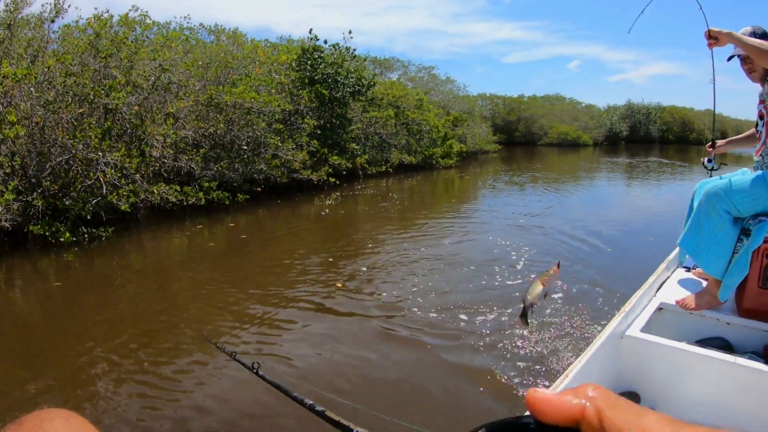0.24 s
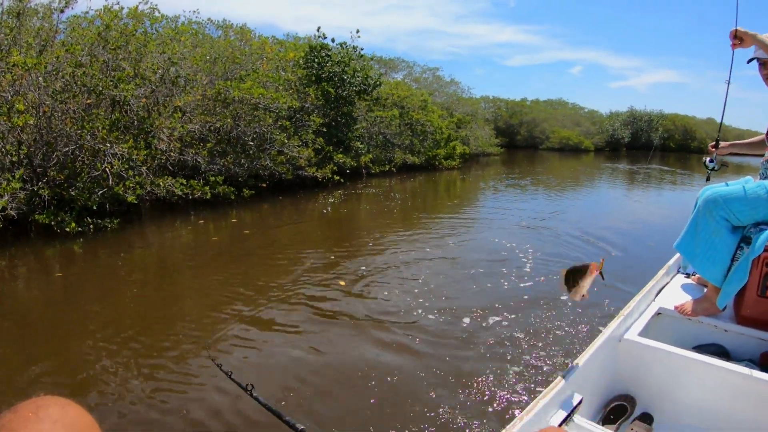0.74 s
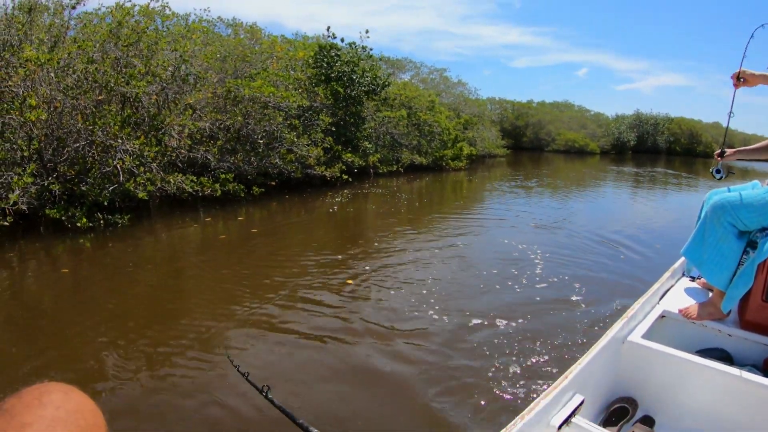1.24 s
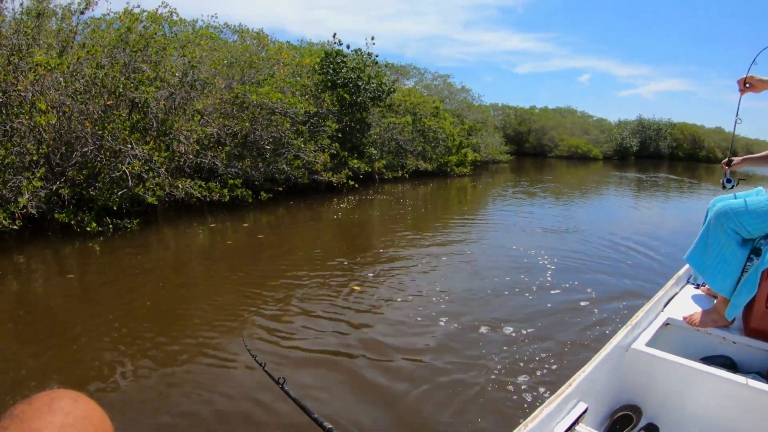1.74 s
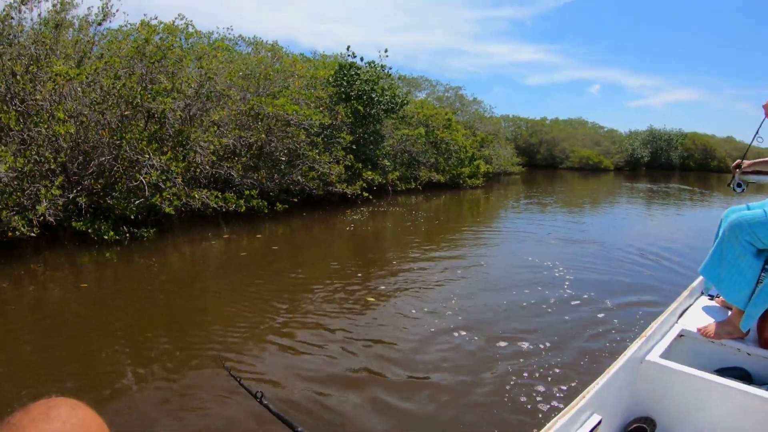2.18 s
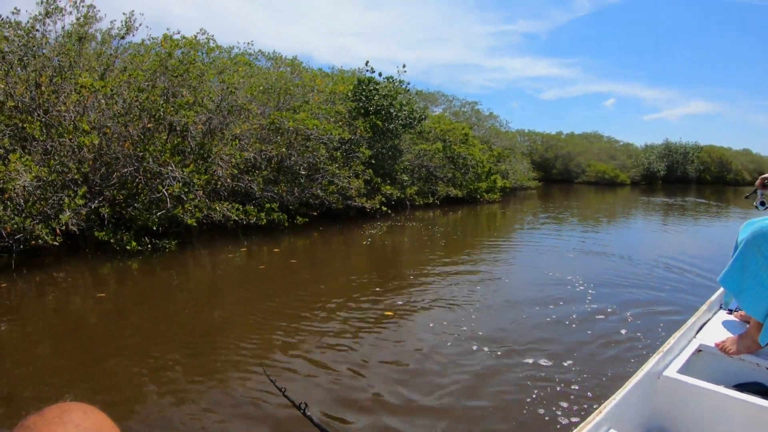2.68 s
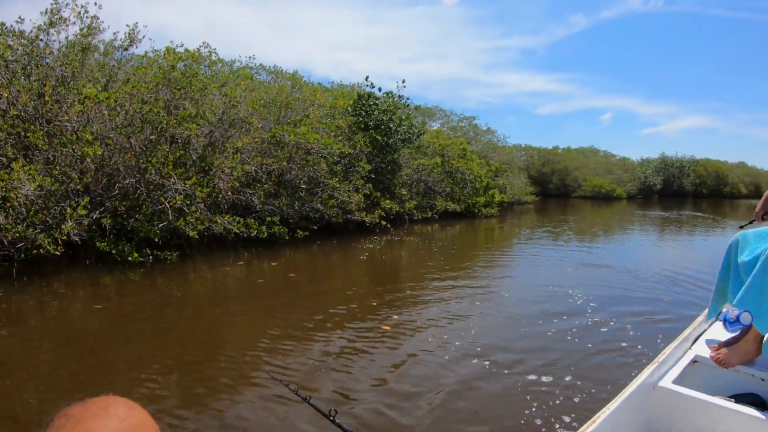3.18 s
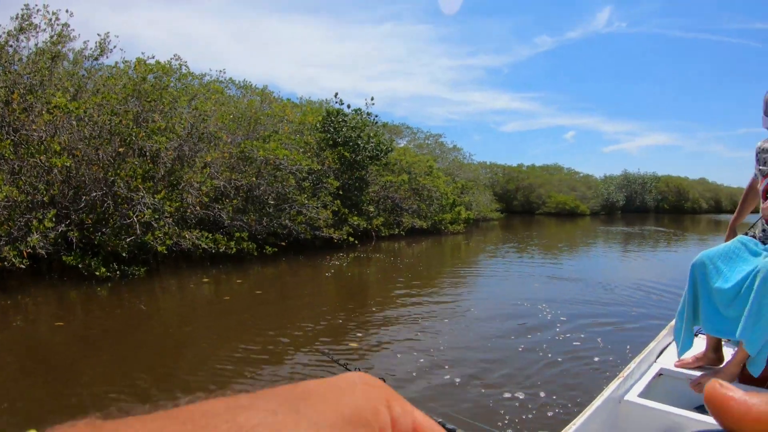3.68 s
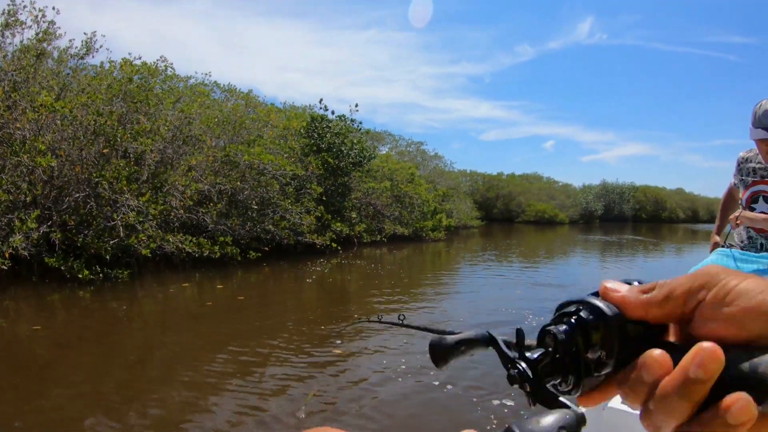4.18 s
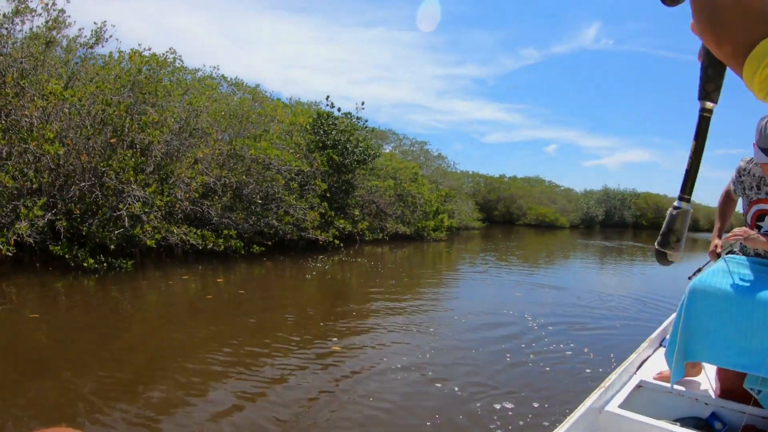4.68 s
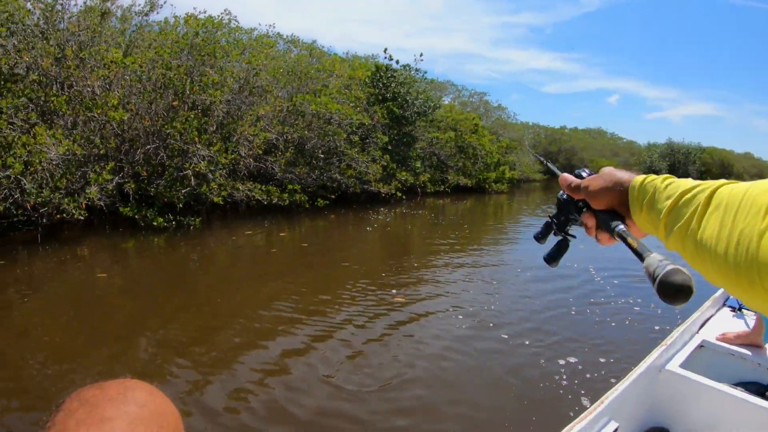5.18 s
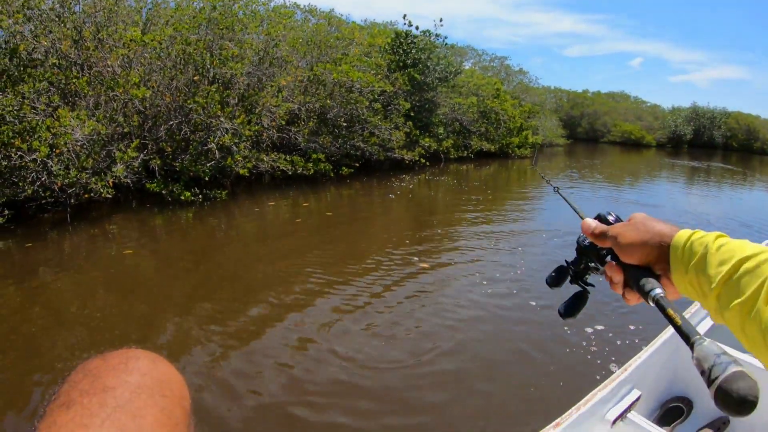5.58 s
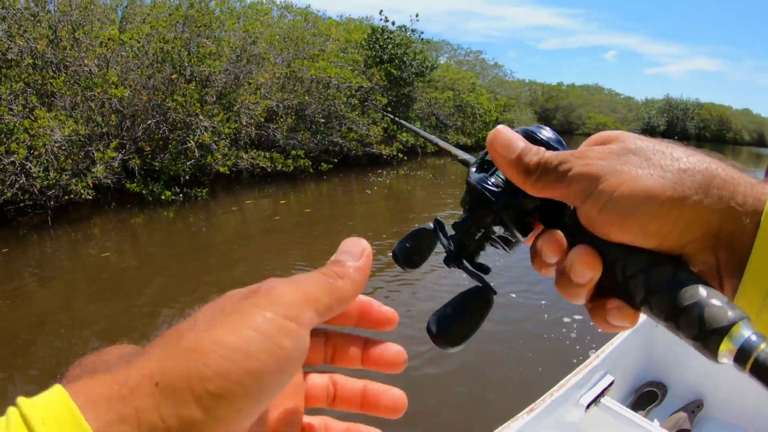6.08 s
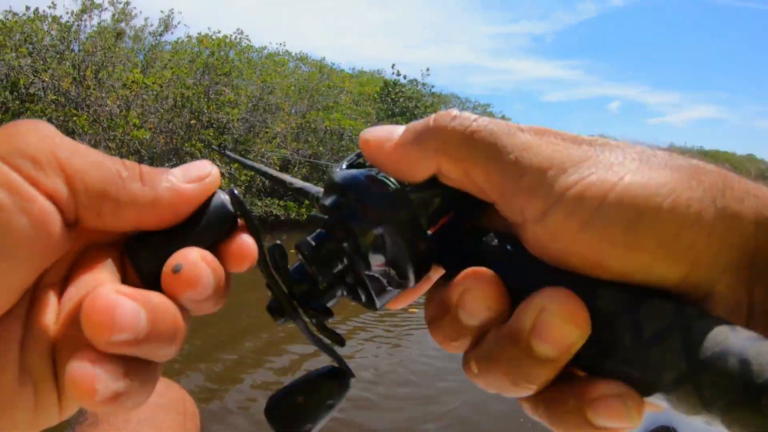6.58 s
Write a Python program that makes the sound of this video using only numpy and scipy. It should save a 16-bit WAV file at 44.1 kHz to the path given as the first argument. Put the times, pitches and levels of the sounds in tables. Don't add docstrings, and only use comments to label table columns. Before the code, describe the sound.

A very low, faint motor hum and gentle lapping, fizzing water run throughout, close and dry in open air. From 0 to 1 s there are only small drips and bubbles. At 1.1 s a wet slap hits the hollow fibreglass hull with a bright crackle, followed by weaker flops and drips until 2.3 s. At 2.65 s a thump starts the main struggle: rapid tail flicks at 2.8-2.9 s, the loudest slap and booming hull blow at about 3.0 s, another hard flop at 3.26 s, then irregular thumps, spray and gurgling bubbles fading by 4 s. The rod rattles lightly on deck from 3.1 to 4.7 s; a sharp metallic catch clicks at 4.15 s. A soft broad swish peaks at 4.95 s, with a faint rising whistle, slosh and bumps around 5.05 s. Barely audible line hiss and squeaks follow until 5.8 s. Quick reel snaps at 6.5 s lead into quiet gear winding.

```python
import sys
import numpy as np
from scipy import signal
from scipy.fft import rfft, irfft, next_fast_len
from scipy.io import wavfile
from scipy.ndimage import uniform_filter1d, map_coordinates

SR = 44100
rng = np.random.default_rng(int(sys.argv[2]) if len(sys.argv) > 2 else 0)


def convert_level_to_amplitude(level_db):
    exponent = np.asarray(level_db, float) / 20
    return 10 ** exponent


def materialize(psi):
    bounded = np.clip(np.atleast_2d(psi).T, -1, 1)
    quanta = np.round(bounded * 32767).astype(np.int16)
    wavfile.write(sys.argv[1], SR, quanta)


N = 301203
SECONDS = np.arange(N) / SR
T = np.arange(SR // 2) / SR


def unit(x):
    return x / np.sqrt(np.mean(x ** 2) + 1e-20)


def noise():
    return rng.standard_normal(N)


def sine(hz):
    return np.sin(2 * np.pi * hz * T)


def curves(rows):
    s, *cols = np.transpose(rows)
    return [np.interp(SECONDS, s, c) for c in cols]


def wobble(rate):
    return map_coordinates(rng.standard_normal(int(N * rate / SR) + 4), [np.arange(N) * rate / SR])


def coloured(x, spectrum):
    m = next_fast_len(N + 8192)
    f, v = np.transpose(spectrum)
    log_hz = np.log(np.fft.rfftfreq(m, 1 / SR) + 1)
    gain = convert_level_to_amplitude(np.interp(log_hz, np.log(f + 1), v, left=-120, right=-120))
    return unit(irfft(rfft(x, m) * gain, m)[:N])


def bands(modes):
    f = np.fft.rfftfreq(N, 1 / SR)
    gain = sum(convert_level_to_amplitude(db) / (1 + (2 * (f - hz) / width) ** 2) for hz, width, db in modes)
    return unit(irfft(rfft(noise()) * gain, N))


def grainy(per_s, spread_db, share, life):
    hits = (rng.random(N) < per_s / SR) * convert_level_to_amplitude(spread_db * np.minimum(rng.exponential(size=N), 3.2))
    swell = signal.lfilter([1], [1, -np.exp(-1 / (life * SR))], hits)
    share = np.clip(share, 0, 1)
    return noise() * (1 - share + share * unit(swell))


def patchy(x, depth_db):
    z = signal.stft(x, nperseg=512)[2]
    field = uniform_filter1d(rng.standard_normal(z.shape), size=12, axis=0)
    field = uniform_filter1d(field, size=12, axis=1)
    return signal.istft(z * convert_level_to_amplitude(depth_db * unit(field)), nperseg=512)[1][:N]


def shape(t60, rise):
    e = convert_level_to_amplitude(-60 * T / max(t60, .004)) * (1 - np.exp(-T / max(rise, 1e-4))) ** 2
    return e / e.max()


def ring(modes, rise, luck):
    return sum(convert_level_to_amplitude(db) * shape(t60, rise) * np.sin(2 * np.pi * (hz * T + a))
               for (hz, db, t60), a in zip(modes, luck))


def add(track, s, sound):
    part = track[round(s * SR):][:len(sound)]
    part += sound[:len(part)]


# start in seconds, peak in dB, pitch in Hz, overtones in dB.
SLAPS = [(1.056, -34, 715, -5.5), (1.108, -18.5, 504, -23), (1.121, -32, 340, -23), (1.225, -42, 500, -39),
         (1.381, -35, 464, -17.5), (1.785, -37.5, 630, -10), (1.904, -40.5, 418, -20),
         (2.273, -37.5, 600, 0), (2.666, -22.5, 362, -20), (2.989, -21, 321, -7.5), (3.12, -20, 611, -17),
         (3.257, -14, 720, -19), (3.271, -19, 670, -21), (3.43, -32, 658, -10), (3.53, -27.5, 323, -15),
         (3.646, -27, 314, -11), (3.791, -31.5, 642, -25), (3.814, -26, 650, -13), (3.943, -36.5, 650, -17),
         (5.046, -30.5, 355, -23), (5.075, -25.5, 482, -8.5)]
# start in seconds, peak in dB, pitch in Hz, overtones in dB.
FLICKS = [(2.812, -26, 740, -11), (2.824, -21, 760, -9.5), (2.831, -18, 720, -5.5), (2.841, -14, 753, -19),
          (2.853, -29, 700, -20.5), (2.862, -14.5, 740, -23), (2.873, -21, 700, -5),
          (2.886, -21.5, 740, -9.5), (2.893, -18, 640, -12), (2.902, -24.5, 620, -6.5),
          (6.535, -29.5, 693, -8)]
# start in seconds, peak in dB, pitch
# in Hz.
SOFT_SLAPS = [(0.044, -41.5, 820), (0.067, -41, 660), (0.094, -39.5, 620), (0.333, -37.5, 607),
              (1.194, -43, 338), (2.294, -43, 663), (2.593, -38.5, 290), (4.059, -48, 740), (1.6, -44, 300),
              (4.585, -47, 320), (6.38, -50.5, 620), (5.62, -54, 460), (5.45, -50, 495), (1, -46, 680),
              (5.389, -46, 530), (6.042, -46, 392), (6.21, -48.5, 580)]
# start in seconds, peak in dB, pitch in Hz, overtones in dB, t60 in seconds.
HARDEST_SLAP = (3, -4.5, 672.5, -17, 0.0431)
# frequency in Hz, density in dB per Hz.
WASH_BODY = [(200, -41.5), (320, -1.5), (520, 0.5), (700, 2), (950, -14), (1300, -55)]
# frequency in Hz, density in dB per Hz.
WASH_SPRAY = [(800, -26.5), (1050, 17), (1400, 14), (2000, -44), (2600, -15), (3200, -62)]


def fish():
    slap_t60, slap_rise = 0.061, 0.00079
    flick_t60, flick_rise = 0.021, 0.0014
    soft_t60, soft_over_db = 0.062, -16.5
    hits = [(*row, slap_t60, slap_rise) for row in SLAPS]
    hits += [(*row, flick_t60, flick_rise) for row in FLICKS]
    hits += [(*row, soft_over_db, soft_t60, slap_rise) for row in SOFT_SLAPS]
    hits += [(*HARDEST_SLAP, slap_rise)]
    out, wet = np.zeros(N), np.zeros((N, 2))
    for (s, db, hz, over_db, t60, rise), luck in zip(hits, rng.random((len(hits), 6))):
        over = sum(np.sin(2 * np.pi * (1000 + 1300 * a ** 1.57) * T + 40 * a) for a in luck)
        pocket = sine(hz) + convert_level_to_amplitude(over_db - 16.0) * over
        add(out, s, convert_level_to_amplitude(db - 4) * shape(t60, rise) * pocket)
        add(wet, s, shape(1.54 * t60, 0.0048)[:, None] * convert_level_to_amplitude([db - 15, db + over_db - 14.5]))
    drops = grainy(90, 1.1, 0.086, 0.014)
    return out + wet[:, 0] * coloured(drops, WASH_BODY) + wet[:, 1] * coloured(drops, WASH_SPRAY)


# start in seconds, peak in dB, panel pitch in Hz, t60 in seconds.
THUMPS = [(1.063, -38, 270, 0.29), (1.107, -15.5, 248, 0.058), (1.112, -27.5, 148, 0.11),
          (1.148, -25, 201, 0.024), (1.198, -29.5, 263, 0.073), (1.246, -36.5, 278, 0.085),
          (1.318, -37, 261, 0.08), (1.368, -38, 267, 0.042), (1.424, -43, 283, 0.075),
          (1.9, -26.5, 184, 0.087), (2.678, -21.5, 167.7, 0.15), (2.71, -22, 194, 0.016),
          (2.861, -31, 248, 0.39), (2.916, -20, 148, 0.23), (2.984, -10.5, 248, 0.11),
          (3.12, -25.5, 347, 0.053), (3.256, -21.5, 110.5, 0.29), (3.285, -25, 108, 0.39),
          (3.419, -22.5, 149.6, 0.14), (3.448, -35.5, 312, 0.038), (3.469, -27.5, 125.5, 0.082),
          (3.533, -28, 153, 0.19), (3.587, -31, 258, 0.042), (3.644, -15.5, 168.6, 0.054),
          (3.671, -19, 149.4, 0.077), (3.79, -26, 146.4, 0.15), (3.819, -21, 131.8, 0.19),
          (3.828, -27, 295, 0.055), (3.857, -35.5, 315, 0.051), (3.86, -24.5, 110, 0.083),
          (3.941, -26, 150, 0.091), (3.945, -35.5, 323, 0.059), (3.968, -29, 138.7, 0.2),
          (3.997, -50, 277, 0.068), (4.034, -62, 224, 0.064)]
# start in seconds, peak in dB, panel pitch in Hz.
SHIFTS = [(0.089, -48, 181), (2.266, -40.5, 163.4), (4.562, -40, 141), (4.906, -38.5, 108),
          (5.003, -29, 127.3), (5.049, -42, 170), (5.796, -41, 130), (6.451, -34, 131.2),
          (6.671, -43.5, 184)]
# start in seconds, ring in dB, impact in dB.
BLOWS = [
    (1.109, -27.5, -18.5),
    (2.958, -17, -7.5),
    (3.255, -22.5, -36),
]
# frequency in Hz, level in dB, t60 in seconds.
HULL_MODES = [(108, 0, 0.28), (190.2, 5.5, 0.11), (248, 5, 0.18)]


def hull():
    out = np.zeros(N)
    shift_t60 = 0.26
    for s, db, hz, t60 in THUMPS + [(*row, shift_t60) for row in SHIFTS]:
        add(out, s, convert_level_to_amplitude(db) * shape(t60, 0.0018) * sine(hz))
    for s, db, impact_db in BLOWS:
        shell = sum(convert_level_to_amplitude(db + level) * shape(t60, 0.0016) * sine(hz) for hz, level, t60 in HULL_MODES)
        add(out, s, shell)
        dent = -convert_level_to_amplitude(impact_db + 3) * shape(0.032, 0.00064) * sine(270)
        add(out, s - .0026, dent)
    return out


# start in seconds, peak in dB, t60 in seconds, low band in dB.
SNAPS = [(1.058, -34, 0.064, -22), (1.0897, -41, 0.35, -6.5), (1.109, -32.5, 0.049, 1),
         (1.596, -46.5, 0.13, -4.5), (1.778, -37.5, 0.13, -14), (1.894, -42.5, 0.07, -15),
         (2.272, -35, 0.057, -13), (2.596, -52, 0.059, -6), (2.663, -28.5, 0.071, -7.5),
         (2.809, -34, 0.071, -21), (2.8294, -41, 0.09, 8), (2.865, -36, 0.097, 5), (2.8944, -42, 0.1, 0),
         (2.927, -38, 0.16, -8), (2.952, -29, 0.059, -4), (3.12, -33.5, 0.059, -4.5),
         (3.257, -35, 0.11, -3), (3.307, -50, 0.071, 6), (3.423, -37, 0.04, -9), (3.44, -36.5, 0.051, -2.5),
         (3.527, -37.5, 0.065, -17), (3.793, -40, 0.017, -14), (3.812, -53.5, 0.16, 2),
         (4.244, -42.5, 0.11, -45), (5.738, -46, 0.34, -15.5)]
# start in seconds, peak in dB.
TICKS = [(0.4788, -49), (0.513, -49), (0.5915, -62), (1.021, -50), (2.316, -45.5), (2.9936, -41.5),
         (3.057, -43), (3.486, -46), (3.6476, -45), (3.771, -47.5), (4.0953, -54), (4.333, -54),
         (4.4939, -52), (6.392, -50), (6.4843, -53), (6.5901, -51), (6.6135, -51), (6.641, -55),
         (6.755, -55)]
# centre in seconds, level in dB, half-width in seconds, low band in dB.
SHEETS = [(0.7, -68, 0.038, -2), (2.05, -72, 0.079, 1.5), (2.49, -63.5, 0.034, -4),
          (2.636, -56, 0.023, 6.5), (3.411, -61, 0.0088, -8), (3.71, -62.5, 0.02, -9),
          (4.138, -56, 0.0078, -4), (6.2, -69, .08, -4.5)]
# frequency in Hz, density in dB per Hz.
CRACKLE_BRIGHT = [(1760, -13.5), (3000, -13), (3510, -8), (4010, 0.5), (4860, 0.5), (5450, 0), (6320, 1.5),
                  (6890, -12), (8060, -21.5), (9000, -41.5), (11700, -36), (19800, -120)]
# frequency in Hz, density in dB per Hz.
CRACKLE_TOP = [(5290, -12), (9000, -5.5), (9770, -14.5), (11200, -20), (11800, -11.5), (12500, -4),
               (14000, -10.5), (15600, -17)]
# frequency in Hz, density in dB per Hz.
CRACKLE_LOW = [(900, -15), (1200, 7.5), (2000, -6.5), (2900, -21.5), (3300, -27)]


def snaps():
    tick_t60, tick_low_db, top_db = 0.049, -9.5, -23.5
    levels = np.zeros((N, 3))
    for s, db, t60, low_db in SNAPS + [(*row, tick_t60, tick_low_db) for row in TICKS]:
        band_db = [db - 10.5, db + top_db - 4.0, db + low_db - 5.0]
        add(levels, s - .004, shape(t60, 0.0039)[:, None] * convert_level_to_amplitude(band_db))
    for s, db, width, low_db in SHEETS:
        swell = np.exp(-((SECONDS - s) / width) ** 2 / 2)
        levels += swell[:, None] * convert_level_to_amplitude([db, db + top_db + 2, db + low_db])
    crackle = grainy(360, 0.75, 0.41, 0.0012)
    spectra = (CRACKLE_BRIGHT, CRACKLE_TOP, CRACKLE_LOW)
    return sum(level * coloured(crackle, band) for level, band in zip(levels.T, spectra))


# start in seconds, peak in dB.
SPIKES = [(1.059, -49), (1.1079, -39), (1.7816, -43), (1.898, -54), (2.2727, -40), (2.663, -42),
          (2.8639, -51), (2.9527, -36), (3.1226, -57), (3.2568, -47.5), (3.4246, -43.5), (3.4394, -49.5),
          (3.5293, -40.5), (3.5663, -59), (3.6491, -57), (3.7683, -52.5), (3.7903, -57.5), (3.8127, -62)]
# frequency in Hz, density in dB per Hz.
SPIKE_COLOUR = [(1500, -9), (3000, -3.5), (4200, 1), (6500, -1.5), (8500, -6), (11000, -22), (12600, -8.5),
                (15600, -19.5)]


def spikes():
    level = np.zeros(N)
    for s, db in SPIKES:
        add(level, s, convert_level_to_amplitude(db - 3.0) * shape(.008, .001))
    return level * coloured(noise(), SPIKE_COLOUR)


# start in seconds, peak in dB, upper modes in dB, favoured pitch in Hz.
BOUNCES = [(3.058, -59.5, 8.5, 1250), (3.121, -37, -8, 1200), (3.31, -34, -3.5, 1110),
           (3.566, -50.5, 9, 1140), (3.65, -44, -9, 1400), (3.716, -42.5, -9, 1410), (3.773, -46, -8, 1420),
           (3.848, -54, -2, 1360), (4.17, -46.5, -7.5, 1410), (4.246, -48, -12, 1250),
           (4.458, -70.5, 4, 1400), (4.502, -64.5, 6.5, 1470), (4.544, -62.5, 1, 1460),
           (4.572, -64, 9, 1310), (4.609, -74, 16, 1430), (4.645, -81, 27.5, 1430),
           (4.717, -85.5, 22, 1400)]
# frequency in Hz, level in dB, t60 in seconds.
GUIDE_MODES = [(1020, 0, 0.22), (1093, -3, 0.066), (1202, -1, 0.14), (1332, 5, 0.057), (1447, 6.5, 0.054),
               (1997, 2.5, 0.069)]
# start in seconds, peak in dB.
TAPS = [(3.646, -57), (3.714, -51), (3.772, -58), (4.095, -49), (4.312, -59.5), (4.326, -67), (4.36, -63),
        (4.372, -61.5)]
# frequency in Hz, level in dB, t60 in seconds.
TIP_MODES = [(830, -7, .06), (1040, -14, 0.26), (1328, -6, 0.074), (1660, -0.5, 0.045), (2354, -8, 0.032)]


def rod():
    blank_hz, blank_t60 = 601, 0.21
    favour_db = 19.5
    out = np.zeros(N)
    note = shape(blank_t60, 0.00022) * sine(blank_hz)
    lucks = rng.standard_normal((len(BOUNCES), len(GUIDE_MODES)))
    for (s, db, upper_db, near_hz), luck in zip(BOUNCES, lucks):
        guides = 0
        for (hz, level, t60), a in zip(GUIDE_MODES, luck):
            mode_db = level + 2 * a - favour_db * abs(np.log2(hz / near_hz))
            tone = np.sin(2 * np.pi * hz * (1 + 0.0047 * a) * T + 9 * a)
            guides = guides + convert_level_to_amplitude(mode_db) * shape(t60, 0.0025) * tone
        add(out, s, convert_level_to_amplitude(db + 8.5) * note + convert_level_to_amplitude(db + upper_db - 2.5) * guides)
    for (s, db), luck in zip(TAPS, rng.random((len(TAPS), len(TIP_MODES)))):
        add(out, s, convert_level_to_amplitude(db) * ring(TIP_MODES, 0.0016, luck))
    return out


# time in seconds, level in dB.
SWISH = [
    (4.74, -84),
    (4.87, -53.5),
    (4.95, -51.5),
    (5.1, -56),
    (5.25, -66),
    (5.4, -90),
]
# frequency in Hz, density in dB per Hz.
SLEEVE = [(250, 3.5), (500, 2.5), (1500, -10.5), (2300, -12), (3000, -35), (4300, -17.5), (6300, -14),
          (8000, -35), (13000, -44), (15500, -40)]
# time in seconds, pitch in Hz, level in dB.
WHIP = [(4.98, 4200, -90), (5.015, 4700, -64), (5.04, 6400, -65), (5.055, 8000, -69), (5.075, 9000, -78),
        (5.14, 12300, -83), (5.18, 13500, -100)]
# time in seconds, level in dB.
WHIRR = [(5.25, -100), (5.35, -84), (5.55, -82), (5.62, -82), (5.8, -78), (5.84, -100)]
# frequency in Hz, density in dB per Hz.
SPOOL = [(6500, -45), (7200, -19), (8200, -5.5), (8900, -12), (9400, -21)]


def cast():
    hz, whistle_db = curves(WHIP)
    flutter, breaks_db = .055 * wobble(1500), 3 * wobble(200)
    whistle_phase = 2 * np.pi * np.cumsum(hz * (1 + flutter)) / SR
    whistle = convert_level_to_amplitude(whistle_db + breaks_db) * np.sin(whistle_phase)
    air = patchy(grainy(90, 2.59, 0.37, 0.0098), 0.57)
    swish = convert_level_to_amplitude(curves(SWISH)[0]) * coloured(air, SLEEVE)
    spool = convert_level_to_amplitude(curves(WHIRR)[0] + breaks_db) * coloured(noise(), SPOOL)
    return swish + whistle + spool


# start in seconds, peak in dB, top band in dB, body in dB.
CLICKS = [(4.146, -19, -30.5, -19), (4.221, -48.5, -28, -18), (4.268, -45, -23, -32),
          (6.4976, -37.5, -7.5, -3), (6.516, -22, -20.5, -19), (6.535, -24.5, -17.5, -10.5)]
# frequency in Hz, level in dB, t60 in seconds.
CATCH_MODES = [(4145, 2.5, 0.0052), (5280, 3.5, 0.0073), (6200, 4, 0.005), (7040, -12, 0.006)]
# frequency in Hz, level in dB, t60 in seconds.
CASE_MODES = [(1330, 11, 0.012), (2510, 5, 0.019), (3250, 6.5, 0.004)]
# time in seconds, level in dB.
WIND_IN = [
    (6.53, -100),
    (6.56, -63.5),
    (6.83, -66),
]
# frequency in Hz, width in Hz, level in dB.
GEARS = [(1220, 180, 11), (3120, 1000, 2), (4500, 770, 1.5), (5600, 500, -12), (8950, 50, -6.5)]
# frequency in Hz, density in dB per Hz.
FIZZ = [(1290, 0.5), (2200, -4.5), (2880, -7), (3690, -5), (4200, 0), (6170, -2.5), (8360, -16),
        (9680, -22), (11200, -29.5), (12600, -17.5), (15600, -30)]


def reel():
    out, scrape, spark = np.zeros(N), np.zeros(N), np.zeros(N)
    for (s, db, top_db, body_db), luck in zip(CLICKS, rng.random((len(CLICKS), 4))):
        add(out, s, convert_level_to_amplitude(db - 12.5) * ring(CATCH_MODES, .0022, luck))
        add(out, s, convert_level_to_amplitude(db + body_db - 10.5) * ring(CASE_MODES, 0.00013, luck))
        add(scrape, s - .02, convert_level_to_amplitude(db - 27) * shape(0.062, 0.048))
        add(spark, s, convert_level_to_amplitude(db + top_db - 5.5) * shape(.007, .0012))
    steel = bands([(hz, 300, db) for hz, db, t60 in CATCH_MODES])
    sparkle = coloured(noise(), CRACKLE_TOP) + convert_level_to_amplitude(12.0) * coloured(noise(), FIZZ)
    gears = convert_level_to_amplitude(curves(WIND_IN)[0]) * bands(GEARS)
    return out + scrape * steel + spark * sparkle + gears


# start in seconds, peak in dB, pitch in Hz, t60 in seconds.
PLIPS = [(0.015, -59, 1370, .05), (0.06, -46.5, 1210, 0.045), (0.079, -52, 1250, 0.031),
         (0.172, -63, 480, .05), (0.18, -56, 1040, 0.065), (0.31, -53, 2360, .012),
         (0.348, -64, 2000, 0.027), (0.361, -57, 1400, 0.048), (0.527, -55.5, 1840, 0.023),
         (0.591, -58, 1840, 0.014), (0.774, -57, 810, 0.09), (1.196, -54, 1140, 0.044),
         (1.315, -58, 1200, 0.039), (1.553, -55.5, 1430, 0.075), (2.867, -36.5, 1354, 0.069),
         (2.895, -31, 1380, 0.071), (2.912, -29, 656, 0.075), (2.932, -35, 695, 0.032),
         (2.937, -42, 1400, .03), (2.969, -21, 639, 0.1), (2.988, -37, 1420, .03),
         (3.002, -35.5, 685, 0.083), (3.076, -48, 613, .05), (3.269, -43.5, 1330, 0.035),
         (3.284, -53, 690, 0.036), (3.437, -49, 1830, 0.024), (3.474, -55, 1290, 0.093),
         (3.483, -45, 750, 0.045), (3.79, -44, 2080, 0.019), (3.829, -30.5, 502, .06),
         (3.855, -43, 614, 0.052), (3.885, -49, 650, 0.043), (4.888, -34.5, 350, 0.025),
         (4.905, -45, 665, .06), (4.995, -53, 1460, .04), (5.079, -49, 1510, 0.053),
         (5.079, -52, 2000, 0.037), (5.108, -48, 1180, 0.046), (5.108, -51, 2120, .04),
         (5.11, -43, 495, .05), (5.13, -45.5, 536, 0.035), (5.159, -51, 1380, .05), (5.2, -51, 568, 0.11),
         (5.218, -61, 1960, 0.032)]
# start in seconds, peak in dB, pitch in Hz, t60 in seconds.
SQUEAKS = [(5.578, -68, 8100, .08), (5.622, -64, 5500, .02), (5.68, -69, 7200, .09),
           (5.755, -68, 6400, .04), (5.785, -67, 4450, .08)]


def plips():
    rise, glide = 0.00085, 1.5
    out = np.zeros(N)
    for s, db, hz, t60 in PLIPS:
        add(out, s, convert_level_to_amplitude(db) * shape(t60, rise) * np.sin(2 * np.pi * hz * T * (1 + glide * T)))
    waver = np.cumsum(1 + .04 * wobble(400)[:len(T)]) / SR
    for s, db, hz, t60 in SQUEAKS:
        add(out, s, convert_level_to_amplitude(db) * shape(t60, .006) * np.sin(2 * np.pi * hz * waver))
    return out


# time in seconds, level in dB.
GURGLE = [(0, -59), (0.5, -67.5), (1.05, -72), (1.2, -55), (1.5, -68.5), (2.55, -65.5), (2.85, -46),
          (3.05, -49.5), (3.2, -62), (3.4, -50), (3.85, -53), (4.1, -67), (6.83, -66.5)]


def gurgle():
    middle_hz, spread, ring_cycles, per_s = 802, 0.553, 8.5, 70
    out, t = np.zeros(N), T[:SR // 20]
    for at, a, b in rng.random((round(per_s * N / SR), 3)):
        hz = middle_hz * np.exp(spread * 3.42 * (a - .5))
        cycles = hz * t / ring_cycles
        level = convert_level_to_amplitude(-14 * b) * middle_hz / hz
        tone = np.sin(2 * np.pi * hz * t * (1 + .12 * cycles))
        add(out, at * N / SR, level * cycles * np.exp(-4 * cycles) * tone)
    return convert_level_to_amplitude(curves(GURGLE)[0]) * unit(out)


# multiple of the shaft rate, level in dB.
HUM = [(1, -60.5), (2, -59), (3, -55), (4, -73.5)]


def motor():
    shaft_hz = 61.3
    turn = 2 * np.pi * np.cumsum(shaft_hz * (1 + 0.0032 * wobble(0.95))) / SR
    out = np.zeros(N)
    for k, db in HUM:
        level = convert_level_to_amplitude(db + 2.5 + 0.57 * wobble(26))
        out += level * np.sin(k * turn + 0.28 * wobble(2.9) + k)
    return out


# time in seconds, agitation in dB, foam over it in dB.
LAP = [(0.0, -56.5, -4.5), (0.49, -69.5, 3.5), (1.0, -71, 4.5), (1.23, -64, -2.5), (1.56, -70.5, 1.5),
       (2.22, -63.5, 1), (2.7, -63.5, 0.5), (2.9, -70, 10.5), (3.25, -57, -12), (3.9, -60.5, -8.5),
       (4.2, -68.5, -8), (4.87, -69, -3.5), (5.04, -51, -12.5), (5.36, -68.5, -0.5), (6.3, -70.5, -2),
       (6.6, -62, -6.5), (6.83, -71, 5.5)]
# peak time in seconds, buffet in dB, rumble in dB, fade in dB per second.
LURCHES = [(0.0, -54, -40, 80), (0.49, -35, -119, 248), (1.16, -39, -31.5, 174), (1.9, -39.5, -53, 209),
           (2.63, -44, -42, 129), (2.85, -39.5, -53, 88), (2.97, -59, -26.5, 231), (3.45, -47.5, -36, 52),
           (5.04, -48, -35, 81), (5.82, -43, -74, 117), (6.83, -57, -50, 30)]
# frequency in Hz, density in dB per Hz.
BUFFET = [(12, -52.5), (24, -27), (40, -8), (70, -10.5), (120, -52)]
# frequency in Hz, density in dB per Hz.
RUMBLE = [(35, -36.5), (60, -13), (178, 5.5), (263, -11), (318, -12), (400, -24.5), (520, -40), (880, -120)]
# frequency in Hz, density in dB per Hz.
SLOSH = [(150, -39.5), (250, -8.5), (426, -11.5), (479, -5), (533, -7.5), (674, 0.5), (871, -11.5),
         (1190, -9.5), (3200, -46.5), (4160, -68), (7040, -120)]


def water():
    calm_buffet_db, calm_rumble_db = -69.5, -51.5
    buffet_fades = 2.5
    slosh_db, foam_db = curves(LAP)
    shake, roll = convert_level_to_amplitude(calm_buffet_db), convert_level_to_amplitude(calm_rumble_db)
    for s, buffet_db, rumble_db, fade in LURCHES:
        away_db = np.abs(SECONDS - s) * fade
        shake = shake + convert_level_to_amplitude(buffet_db - buffet_fades * away_db)
        roll = roll + convert_level_to_amplitude(rumble_db - away_db)
    lumps, swell = 2.5 * wobble(14), 1.5 * wobble(20)
    buffet = shake * convert_level_to_amplitude(0.72 * wobble(5.1)) * coloured(noise(), BUFFET)
    rumble = roll * convert_level_to_amplitude(lumps - 5.5) * coloured(noise(), RUMBLE)
    slosh_grains = patchy(grainy(80, 2, .45, .01), 2)
    slosh = convert_level_to_amplitude(slosh_db + swell) * coloured(slosh_grains, SLOSH)
    fizz_grains = patchy(grainy(60, 4.5, .27, .0015), 2.8)
    fizz = convert_level_to_amplitude(slosh_db + foam_db + swell) * coloured(fizz_grains, FIZZ)
    return buffet + rumble + slosh + fizz


def scene():
    struggle = fish() + hull() + snaps() + spikes()
    tackle = rod() + cast() + reel()
    background = plips() + gurgle() + motor() + water()
    return (struggle + tackle + background)[None]


def top_cut(x):
    return signal.sosfilt(signal.butter(12, 15720, fs=SR, output="sos"), x)


def record(dry):
    return top_cut(dry)


dry = scene()
out = record(dry)
materialize(out)
```